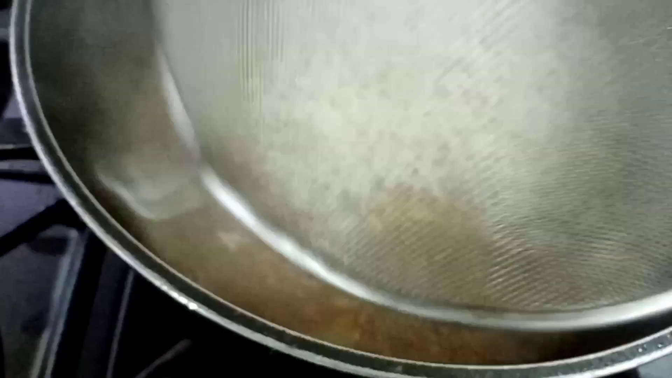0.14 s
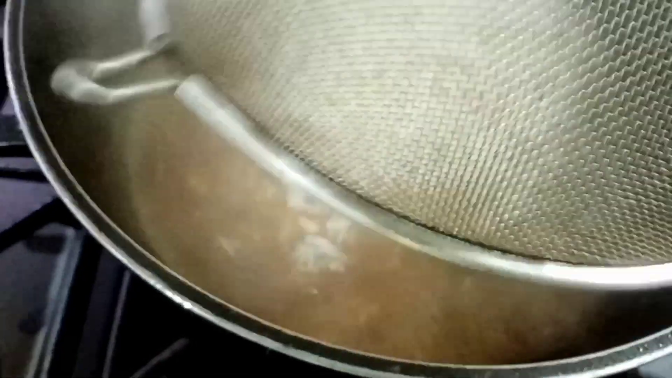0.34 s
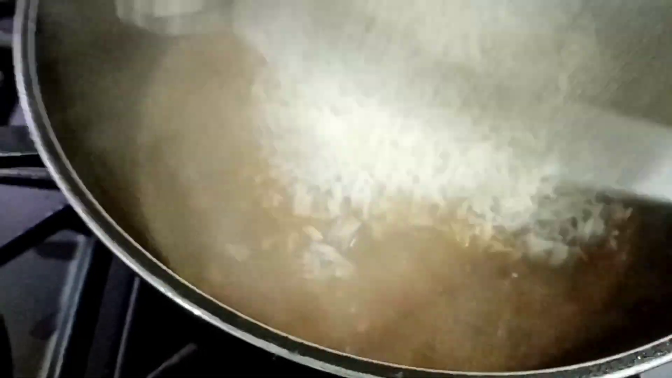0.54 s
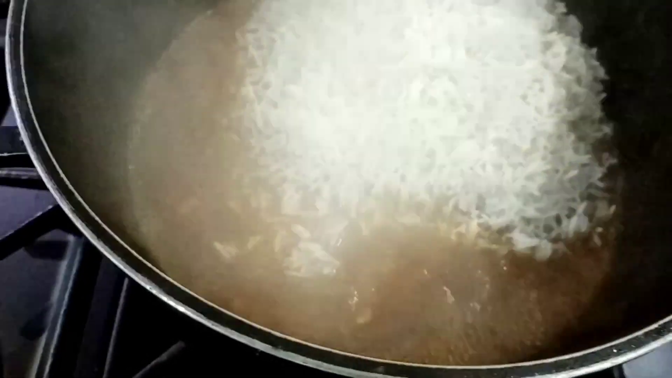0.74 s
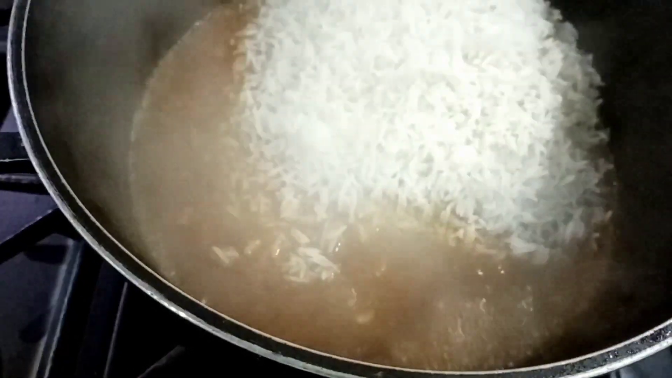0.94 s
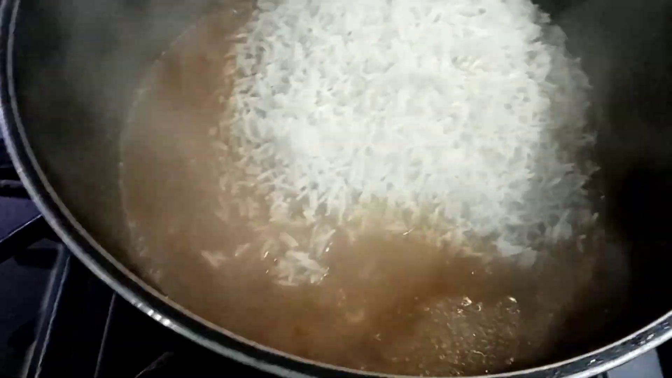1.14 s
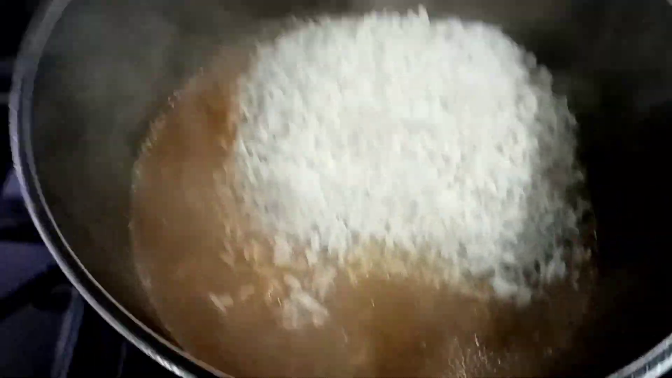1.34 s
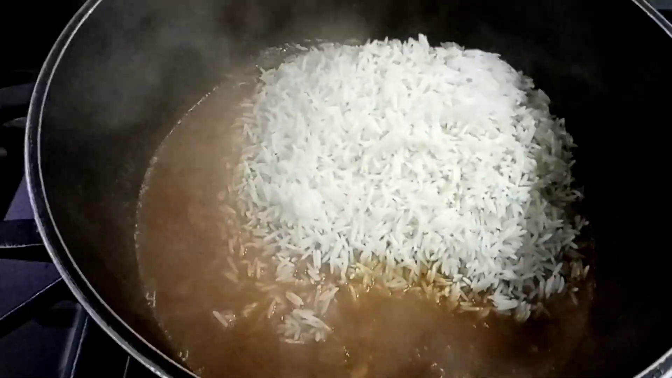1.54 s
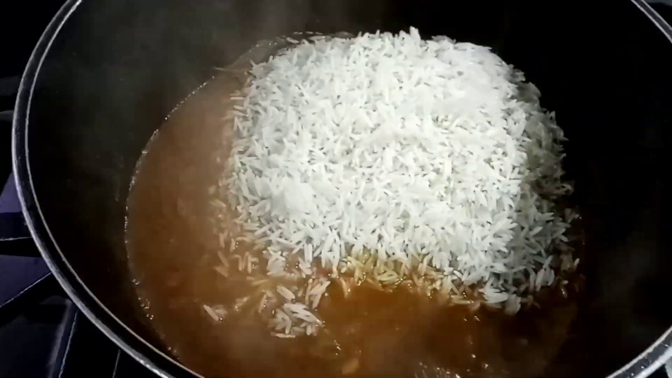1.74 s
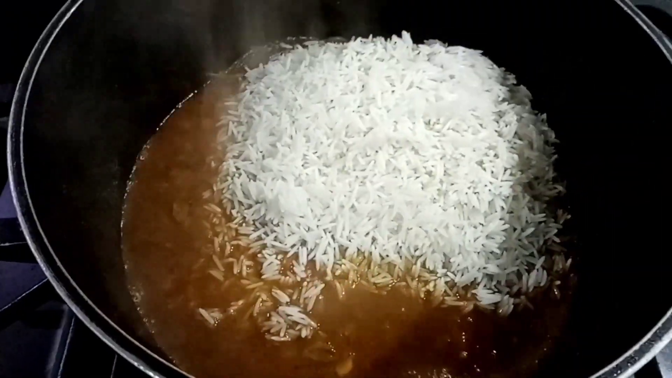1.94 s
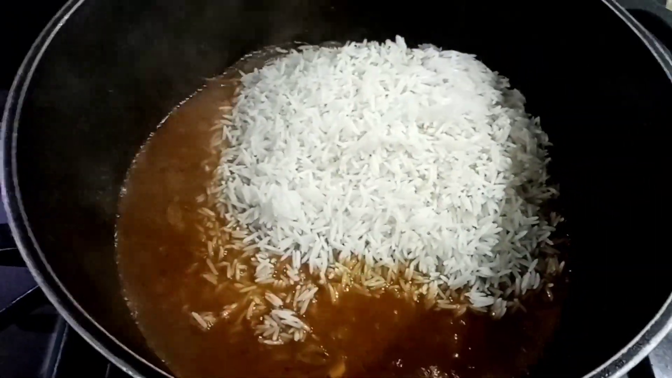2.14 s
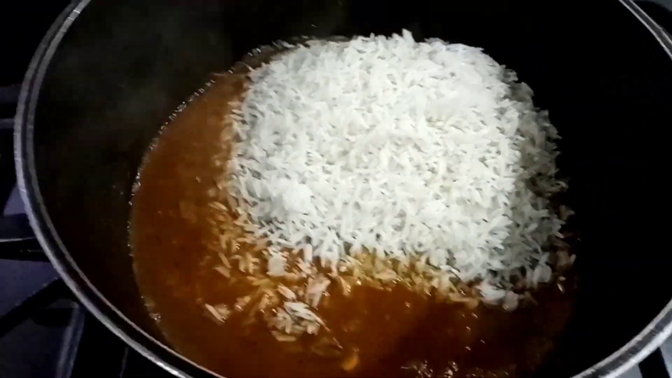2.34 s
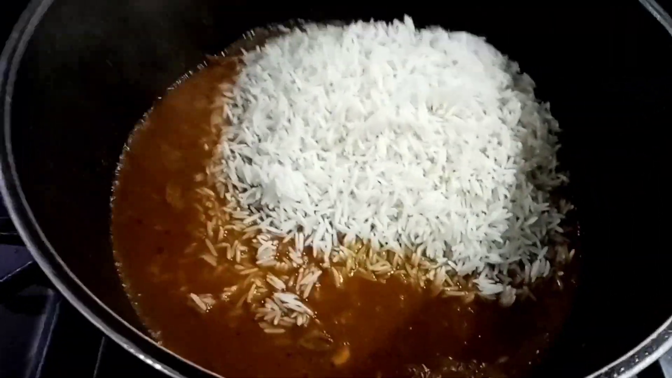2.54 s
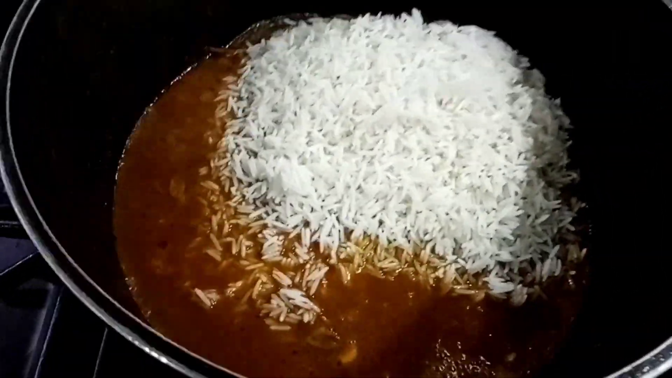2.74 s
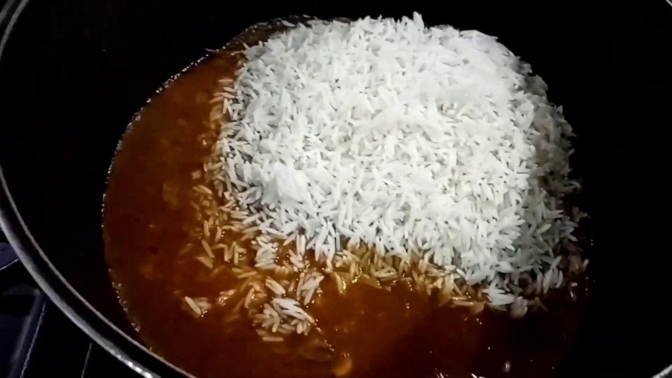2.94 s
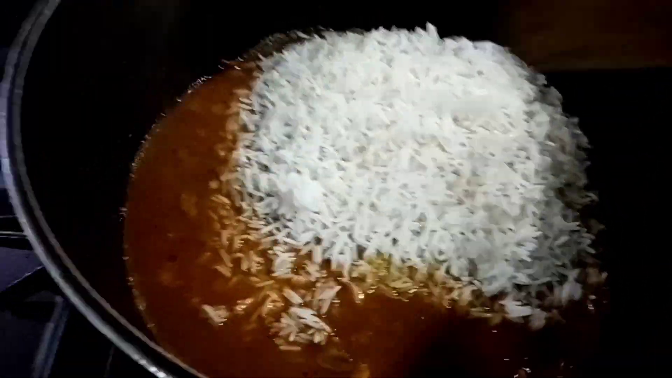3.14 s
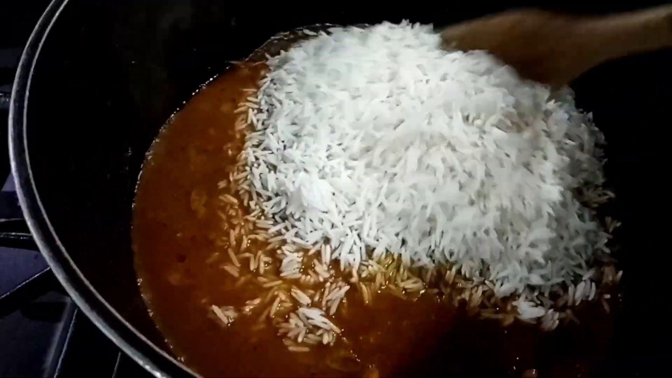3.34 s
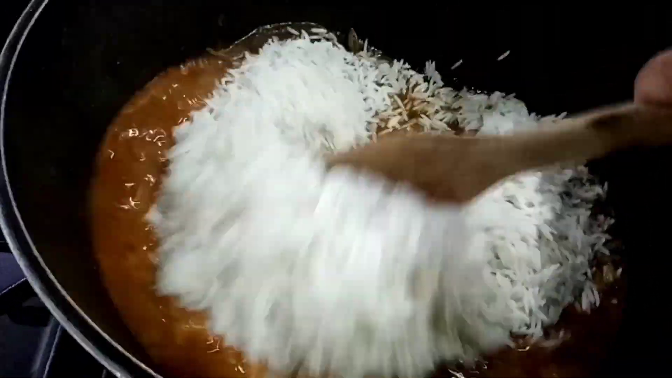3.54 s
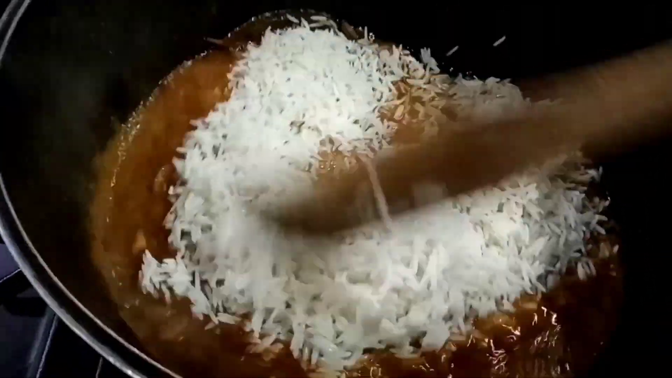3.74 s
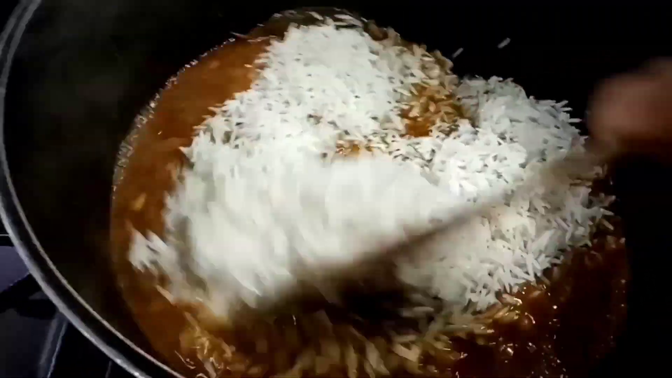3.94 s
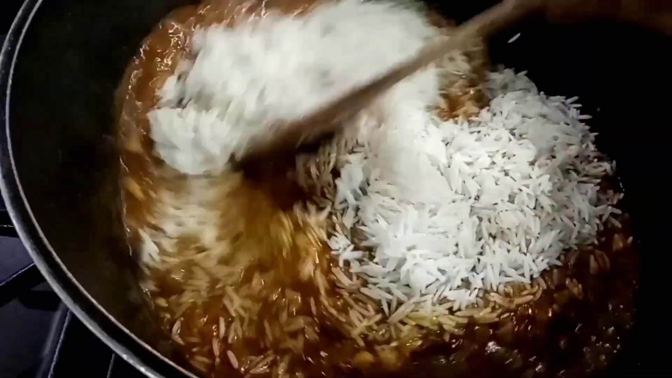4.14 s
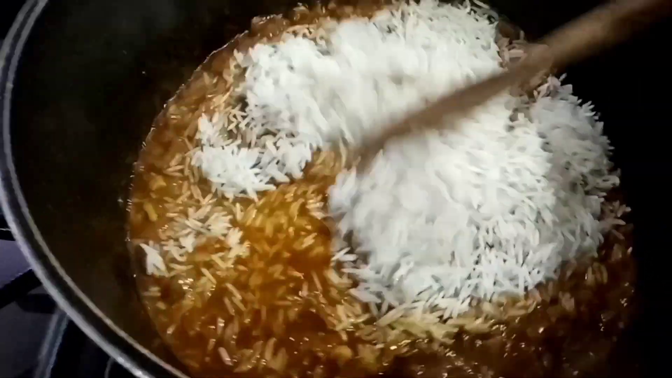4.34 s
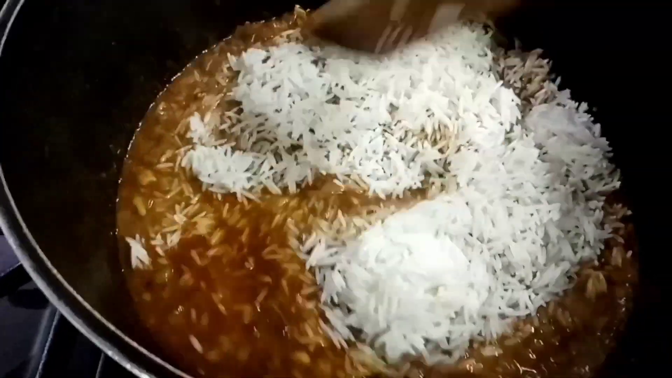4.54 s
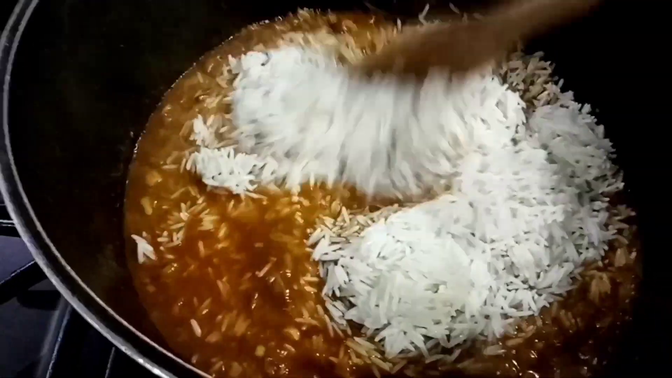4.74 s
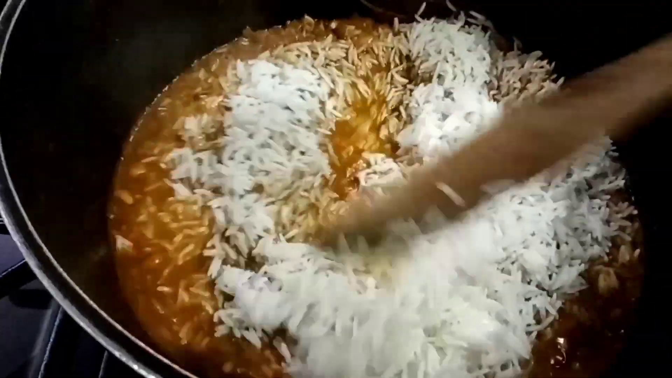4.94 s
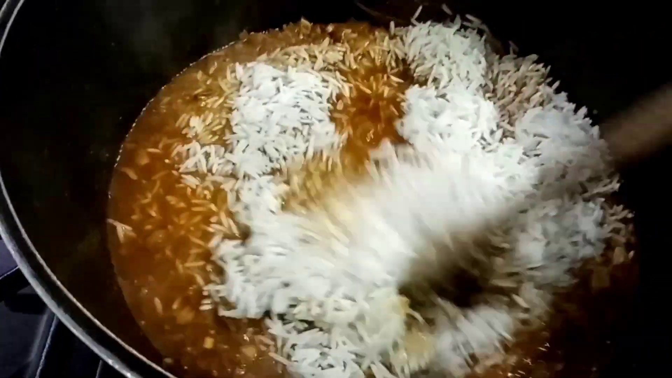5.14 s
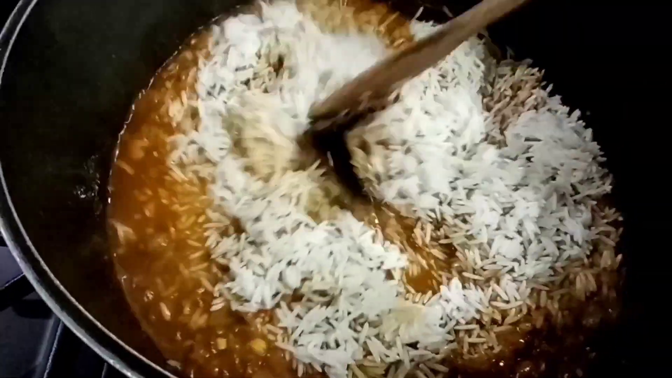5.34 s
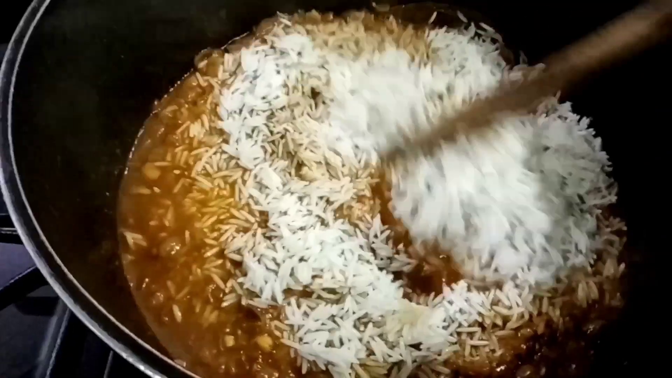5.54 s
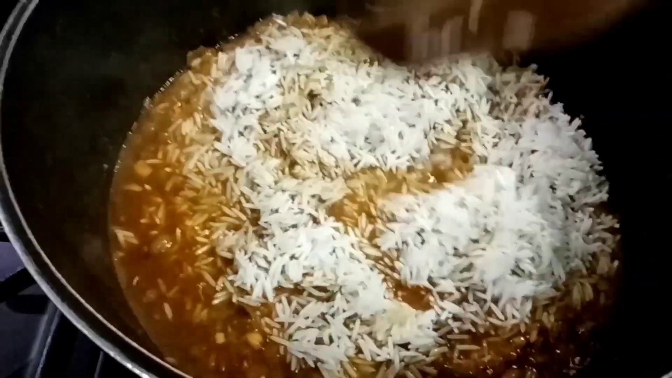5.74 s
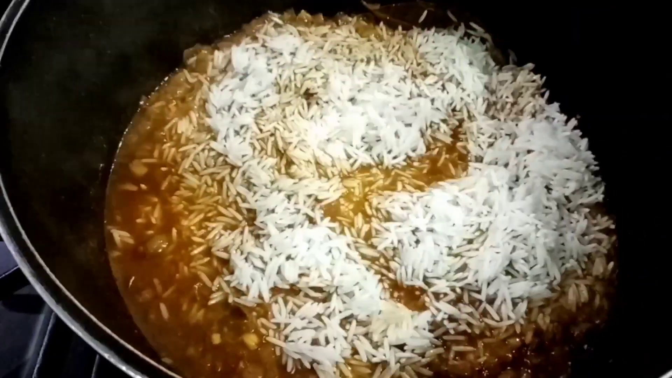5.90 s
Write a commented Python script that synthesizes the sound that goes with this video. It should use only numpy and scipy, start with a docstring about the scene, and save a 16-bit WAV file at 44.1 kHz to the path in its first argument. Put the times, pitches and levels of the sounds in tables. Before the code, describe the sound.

Close up in a small kitchen, broth simmers quietly over a steady low hum. Bright, ringing taps of a metal strainer on the pot come first, with soft plops of falling rice. The strainer then clatters to rest slightly to the right. Bubbles fizz and pop, something squeaks faintly, and a wooden spoon rattles as it is lifted. It stirs the rice with a soft wet rustle and five uneven knocks.

```python
"""Over fizzing broth and an appliance's hum, a metal strainer clinks on the rim of a pot.
The last clumps of rice drop in, bubbles pop, and the strainer is put down with a clatter.
After a few faint squeaks a wooden spoon is picked up and pushed through the rice, knocking on the pot.
Each blow is a short crack plus ringing modes, answered by a small kitchen;
fizz, patter and rubbing are filtered showers of tiny ticks."""
import sys
import numpy as np
from scipy import signal
from scipy.fft import rfft, irfft, next_fast_len
from scipy.io import wavfile
from scipy.ndimage import uniform_filter1d

SR = 44100
rng = np.random.default_rng(int(sys.argv[2]) if len(sys.argv) > 2 else 0)


def put_to_file(sound):
    """Save the sound as 16-bit audio at rate SR, in the file named by the first command-line argument."""
    columns = np.atleast_2d(sound).T  # one column per channel
    safe = np.clip(columns, -1, 1)
    whole_steps = np.round(safe * 32767)
    wavfile.write(sys.argv[1], SR, whole_steps.astype(np.int16))


N = 263277
TIME = np.arange(N) / SR
MIC_LAG_S = 0.0008


def undb(db):
    """Decibels to gain."""
    return 10 ** (np.asarray(db) / 20)


def unit(x):
    """Scale to rms 1."""
    return x / np.sqrt(np.mean(x ** 2))


def across(hz, points):
    """Interpolate (freq_hz, value) points on a log-frequency axis."""
    freq_hz, value = np.transpose(points)
    return np.interp(np.log(np.maximum(hz, 1)), np.log(freq_hz), value)


def colour(x, points):
    """Minimum-phase filter through (freq_hz, gain_db) points: rings after a blow, never before."""
    size = next_fast_len(x.shape[-1] // 2 + 2048) * 2
    gain = undb(across(np.fft.rfftfreq(size, 1 / SR), points))
    cepstrum = irfft(np.log(gain))
    cepstrum[1:size // 2] *= 2
    cepstrum[size // 2 + 1:] = 0
    return irfft(rfft(x, size) * np.exp(rfft(cepstrum)), size)[..., :x.shape[-1]]


def swells(rows):
    """Gain over time, one bell curve per row."""
    return sum(undb(db) * np.exp(-2 * ((TIME - mid_s) / half_s) ** 2) for mid_s, db, half_s in rows)


def wander(rate_hz):
    """Smooth random curve, rms 1."""
    hold = int(SR / rate_hz)
    steps = np.repeat(rng.standard_normal(N // hold + 1), hold)
    return unit(uniform_filter1d(uniform_filter1d(steps, hold), hold)[:N])


def add(out, start_s, sound):
    """Mix in a stereo sound; it reaches the left mic first."""
    for channel, arrival_s in enumerate((start_s - MIC_LAG_S / 2, start_s + MIC_LAG_S / 2)):
        i = int(arrival_s * SR)
        out[channel, i:i + sound.shape[1]] += sound[channel, :N - i]


def stereo_noise(size, alike_hz):
    """White noise at two mics: alike in the bass, unrelated well above alike_hz."""
    mid, side = rfft(rng.standard_normal((2, size)))
    likeness = 1 / (1 + (np.fft.rfftfreq(size, 1 / SR) / alike_hz) ** 2)
    spectra = mid * np.sqrt(1 + likeness) + np.outer([1, -1], side * np.sqrt(1 - likeness))
    return unit(irfft(spectra, size))


# room decay: freq_hz, t60_s
ROOM_DECAY = [(150, 0.51), (700, 0.79), (3000, 0.61), (7000, 0.46), (14000, 0.33)]


def kitchen(x, first_s=0.0019, build_s=0.00023):
    """Dense reflections that build up quickly and die sooner in the treble."""
    hz, t, cells = signal.stft(stereo_noise(SR, 260), SR, nperseg=256)
    decay = undb(-60 * t / across(hz, ROOM_DECAY)[:, None])
    tail = signal.istft(cells * decay, SR)[1][:, :SR]
    onset = 1 - np.exp(-np.maximum(TIME[:SR] - first_s, 0) / build_s)
    return signal.fftconvolve(x, unit(tail * onset) / np.sqrt(SR), axes=1)[:, :N]


def grains(rate_hz, spread_db, room_db):
    """A shower of tiny random ticks, smeared by the room."""
    size = undb(spread_db * np.minimum(rng.exponential(size=N), 5))
    ticks = (rng.random(N) < rate_hz / SR) * size * rng.choice([-1, 1], N)
    ticks = np.array([ticks, np.roll(ticks, int(MIC_LAG_S * SR))])
    return unit(ticks + undb(room_db) * kitchen(ticks))


def bubble(hz, cycles=9, glide=0.012):
    """A bursting bubble rings for a few cycles, rising a little."""
    age = hz * TIME[:SR // 50] / cycles
    ring = np.exp(-age) * np.sin(2 * np.pi * cycles * age * (1 + glide * age))
    return np.tile(ring, (2, 1))


def wet_ticks(count, spread_db=9, low_hz=4800, high_hz=12000, room_db=-4):
    """Small bubbles burst at random, each with its own pitch and size."""
    out = np.zeros((2, N))
    for when, pitch, size in rng.random((count, 3)):
        start_s = MIC_LAG_S + when * (TIME[-1] - 2 * MIC_LAG_S)
        pitch_hz = low_hz * (high_hz / low_hz) ** pitch
        add(out, start_s, undb(spread_db * size ** 2) * bubble(pitch_hz, cycles=3.5))
    return unit(out + undb(room_db) * kitchen(out))


# broth boiling up: mid_s, level_db, half_length_s
SURGES = [(2.32, -55, 0.028), (2.53, -57, 0.14), (2.95, -67, 0.5)]
# broth spectrum: freq_hz, gain_db
SIMMER_COLOUR = [(400, -4.5), (1200, 3.5), (2200, 1.5), (3400, -13), (4300, 3.5), (5200, -4.5), (6300, 5),
                 (7600, -2), (9300, 6), (11000, -8.5), (13500, -11), (15300, 5.5)]


def simmer(start_db=-52.5, cooling_db_per_s=0.65):
    """Tiny bubbles fizz in uneven surges, sinking slowly as the rice cools the broth."""
    fizz = unit(colour(grains(rate_hz=2200, spread_db=3.5, room_db=20.5), SIMMER_COLOUR))
    ticks = undb(-9.5) * wet_ticks(count=380)
    heat = undb(start_db - cooling_db_per_s * TIME) + swells(SURGES)
    return (fizz + ticks) * heat * undb(1.2 * wander(21))


# hum harmonics: freq_hz, rms_db
HUM = [(100, -46), (200, -61.5), (300, -72)]
# air spectrum: freq_hz, gain_db
AIR_COLOUR = [(20, -8), (50, -7), (100, 10.5), (150, 1), (260, 1.5), (450, -6.5), (720, -2), (850, -5.5),
              (1020, -1), (1350, -13), (3000, -10), (8000, -21.5)]


def appliance(air_db=-53.5, left_lead_rad=0.83):
    """A mains hum that wavers a little, over a soft rush of air."""
    phase = 0.14 * wander(4) + np.array([[left_lead_rad], [0]])
    waver = undb(0.5 * wander(9))
    hum = sum(np.sqrt(2) * undb(db) * np.sin(2 * np.pi * hz * TIME + hz / HUM[0][0] * phase)
              for hz, db in HUM)
    air = undb(air_db) * unit(colour(stereo_noise(N, 74), AIR_COLOUR))
    return hum * waver + air * undb(0.5 * wander(4.75))


def crack(t60_s, alike_hz):
    """A contact shakes all the crowded, well-damped modes equally; their phases scatter as they die."""
    fade = np.exp(-np.log(1000) * TIME[:SR // 2] / t60_s)
    phase = np.angle(rfft(stereo_noise(SR // 2, alike_hz) * fade, SR))
    flat_burst = irfft(np.exp(1j * phase))[:, :SR // 2]
    return flat_burst * np.sqrt(np.sum(fade ** 2))


def blow(start_s, db, hard_db, t60_s, ping_hz, spectrum, modes, ring_db,
         room_db, bass_db, ping_db, rise_s, alike_hz, ring_room_db=-6):
    """One contact: a short crack and ringing modes. Returns (direct, room send)."""
    t = TIME[:SR // 2]
    attack = undb(db) * (1 - np.exp(-t / rise_s))
    hardness = [(300, bass_db), (1500, 0), (6500, hard_db)]  # harder is brighter
    burst = colour(colour(attack * crack(t60_s, alike_hz), spectrum), hardness)
    # the struck spot favours its own resonance
    spot = [(ping_hz / 2 ** 0.2, 0), (ping_hz, ping_db), (ping_hz * 2 ** 0.2, 0)]
    mode_hz, mode_db, mode_t60_s = np.transpose(modes)
    partials = np.exp(np.outer(2j * np.pi * mode_hz - np.log(1000) / mode_t60_s, t))
    gains = undb(ring_db + mode_db + across(mode_hz, spot) / 2)
    mic_phasors = np.exp(2j * np.pi * rng.random((2, len(modes))))
    ring = attack * ((gains * mic_phasors) @ partials).imag
    direct, send = np.zeros((2, 2, N))
    add(direct, start_s, colour(burst, spot) + ring)
    add(send, start_s, undb(room_db) * (burst + undb(ring_room_db) * ring))
    return np.array([direct, send])


def in_room(blows, first_s=0.0031):
    """Blows plus their reflections, with the deepest bass below about 60 Hz cut away."""
    direct, send = blows
    low_cut = signal.butter(2, 60, "high", fs=SR, output="sos")
    return signal.sosfilt(low_cut, direct + kitchen(send, first_s))


# pot rim modes: freq_hz, level_db, t60_s, antinode_0_1
RIM_MODES = [(1735, -15, .3, .95), (1836, -19.5, .28, .36), (2085, -11.5, .48, .53), (2340, -15.5, .5, .62),
             (2660, -9, .35, .8), (2965, -6, .22, .33), (3127, -6.5, .24, .53), (3483, -15, .35, .73),
             (3564, -15, .25, .45), (3820, -18, .35, .72), (4167, 0.5, .18, .76), (4384, 1.5, .1, .25),
             (4592, -12, .16, .27), (5883, -6, .14, .87), (6219, -8, .17, .62), (6363, -14, .4, .65),
             (6663, -7, .18, .15)]


def rim_modes(place, node_db=-20, split_hz=25, twin_db=-4):
    """Modes are loudest struck at an antinode; the rim is not quite round, so each has a beating twin."""
    modes = []
    for hz, db, t60_s, antinode in RIM_MODES:
        struck_db = db + node_db * np.sin(np.pi * (place - antinode)) ** 2
        modes += [(hz, struck_db, t60_s), (hz + split_hz, struck_db + twin_db, t60_s)]
    return modes


# strikes on the rim: start_s, level_db, hard_db, ring_db, place_0_1, ping_hz, skid_s
CLINKS = [(0.0865, -8.5, -0.5, -25, 0.05, 6400, 0.0024), (.111, -20, 0, -10.5, 0.94, 5700, .001),
          (0.205, -10, 0.5, -10, 0.39, 6200, 0.015), (0.2128, -16, -19, -12.5, 0, 4340, .001),
          (.224, -18.5, -20, -9, 0.35, 3350, .001), (0.338, -7, 7, -19, 0.72, 6100, 0.0021)]
# rim spectrum: freq_hz, gain_db
RIM_COLOUR = [(60, -13), (220, -11), (450, -7.5), (900, -9.5), (1500, -5), (2200, -10), (3500, -7.5),
              (4250, 1), (5100, -6), (6300, 3), (7600, -1.5), (10000, -4), (13000, -16.5), (15500, -4)]


def strainer_on_rim(t60_s=0.029, shortening=0.31, skid_db=-18.5):
    """The strainer skids on the rim, then catches; the harder the strike, the shorter its crack."""
    blows = skid_gain = 0
    for start_s, db, hard_db, ring_db, place, ping_hz, skid_s in CLINKS:
        crack_t60_s = t60_s * undb(-shortening * hard_db)
        blows += blow(start_s, db, hard_db, crack_t60_s, ping_hz, RIM_COLOUR, rim_modes(place), ring_db,
                      room_db=-3.5, bass_db=3.5, ping_db=8.5, rise_s=0.00063, alike_hz=940,
                      ring_room_db=-9.5)
        run_up = np.exp(-abs(TIME - start_s) / skid_s) * (TIME < start_s)
        skid_gain += undb(skid_db + db + hard_db) * run_up
    return in_room(blows) + skid_gain * unit(colour(stereo_noise(N, 925), RIM_COLOUR))


# rice landing in the broth: mid_s, level_db, half_length_s
CLUMPS = [(.135, -37.5, 0.057), (.237, -36.5, 0.03), (.29, -42.5, 0.034), (.39, -38, 0.033),
          (.44, -45, 0.059)]
# landing spectrum: freq_hz, gain_db
CLUMP_COLOUR = [(90, -21), (160, 0), (228, 6.5), (290, -0.5), (500, -2.5), (680, -11), (930, -8.5),
                (1400, -20), (4000, -41)]


def rice_landing(room_db=-7, left_db=-2):
    """Each clump, shaken loose by the taps, is a soft patter that booms in the hollow of the pot."""
    impacts = grains(rate_hz=2000, spread_db=0, room_db=-8.5)
    patter = swells(CLUMPS) * unit(colour(impacts, CLUMP_COLOUR))
    return undb([[left_db], [0]]) * (patter + undb(room_db) * kitchen(patter))


# larger bubbles: start_s, level_db, pitch_hz
POPS = [(0.653, -45.5, 6800), (2.077, -55, 5950), (2.199, -44, 5900), (2.235, -47, 4400),
        (2.743, -47, 8600), (3.607, -46, 5860), (4.623, -46, 6070), (4.87, -56, 5240), (5.683, -45, 6580)]


def bubble_pops(t60_s=0.029, room_db=-5):
    """The film of a larger bubble snaps and its hollow rings briefly."""
    out = np.zeros((2, N))
    for start_s, db, pitch_hz in POPS:
        snap = colour(crack(t60_s, alike_hz=900), SIMMER_COLOUR)
        add(out, start_s, undb(db) * colour(snap, [(1500, -6), (6000, -0.5)]))
        add(out, start_s, undb(db + 1) * bubble(pitch_hz))
    return out + undb(room_db) * kitchen(out)


# strainer contacts: start_s, level_db, hard_db, t60_s, room_db, ping_hz
CLATTER = [(1.082, -20, -1, 0.11, -6.5, 970), (1.099, -19, -5.5, 0.1, -21, 2360),
           (1.197, -29.5, 1, 0.072, -6, 2200), (1.2522, 3, 0.5, 0.012, -4, 4400),
           (1.2542, -6.5, -6, 0.0084, 5, 1260), (1.2578, -4.5, 0.5, 0.01, 0.5, 3370),
           (1.482, -16, -5.5, 0.042, -2, 2300), (1.4913, -5.5, -11, 0.026, -12, 341),
           (1.4942, -7.5, 2, 0.023, -4, 2880), (1.4992, -6, 4.5, 0.012, -4.5, 6350),
           (1.540, -12.5, -15, 0.032, -23, 2300), (1.573, -11.5, -12, 0.035, -23, 2460)]
# clatter spectrum: freq_hz, gain_db
CLATTER_COLOUR = [(60, -12), (160, -16.5), (235, -3), (320, -0.5), (490, -3.5), (700, 5.5), (960, -5.5),
                  (1300, -3), (1600, -5), (2200, -2.5), (3500, -3.5), (4550, -7.5), (5400, -10), (6300, -4),
                  (7900, -11.5), (9300, -8.5), (13000, -19.5), (15500, -7)]
# clatter modes: freq_hz, level_db, t60_s
CLATTER_MODES = [(325, -1, .16), (395, 0, .16), (590, -3, .16), (718, -7, .48), (760, -7, .42),
                 (804, -7.5, .38), (1864, -7, .2), (2046, -2, .22), (2285, 1, .17), (3060, -3, .16),
                 (4190, 5, .04), (4560, 3, .035), (6230, 2, .14)]


def strainer_put_down(left_db=-2, scrape_s=0.13):
    """The strainer scrapes, lands and rocks to rest off to the right."""
    blows = 0
    for start_s, db, hard_db, t60_s, room_db, ping_hz in CLATTER:
        thud_db = 2 - 0.67 * hard_db  # soft contacts thud more
        rise_s = 0.0007 * (1 + (t60_s / scrape_s) ** 2)  # long ones start more gently
        blows += blow(start_s, db, hard_db, t60_s, ping_hz, CLATTER_COLOUR, CLATTER_MODES, ring_db=-39.5,
                      room_db=room_db, bass_db=thud_db, ping_db=11, rise_s=rise_s, alike_hz=806)
    return undb([[left_db], [0]]) * in_room(blows, first_s=0.012)


# faint scrapes: mid_s, level_db, half_length_s
SQUEAKS = [(2.433, -48, 0.032), (2.453, -43, 0.01), (2.514, -46.5, 0.016), (2.574, -47, 0.026)]
# squeak spectrum: freq_hz, gain_db
SQUEAK_COLOUR = [(1200, -30), (2800, -17), (3060, 3), (3250, -3), (3600, -13), (4200, -21), (5000, -29),
                 (5850, -18), (7000, -27), (12000, -36)]


def squeaks(room_db=-11):
    """Gentle scrapes: uneven stick-slip ticks excite one narrow resonance and weaker ones above it."""
    slips = grains(rate_hz=1800, spread_db=1.5, room_db=-12)
    rub = swells(SQUEAKS) * unit(colour(slips, SQUEAK_COLOUR))
    return rub + undb(room_db) * kitchen(rub)


# wooden spoon modes: freq_hz, level_db, t60_s
SPOON_MODES = [(1490, -6, 0.048), (2593, -3, 0.031), (4200, -9, 0.05)]


def wood_click(start_s, db, treble_db=0, room_db=-9):
    """The spoon's damped modes give a pitched click. Returns (direct, room send)."""
    t, out = TIME[:SR // 4], np.zeros((2, N))
    tilt = [(2600, 0), (4200, treble_db)]
    click = sum(undb(db + mode_db + across(hz, tilt) - 60 * t / t60_s) * np.sin(2 * np.pi * hz * t)
                for hz, mode_db, t60_s in SPOON_MODES)
    add(out, start_s, np.array([click, click]))
    return np.array([out, undb(room_db) * out])


# spoon contacts: start_s, level_db, hard_db, t60_s, ring_db, ping_hz
HANDLING = [(3.147, -33.5, 2.5, 0.12, -27, 6500), (3.1636, -21.5, -6.5, 0.064, -0.5, 4300),
            (3.177, -25, -0.5, 0.13, 2, 2640), (3.2032, -15.5, -6, 0.05, -20, 2630),
            (3.219, -21.5, -6.5, 0.1, -13, 1500), (3.2357, -16.5, -2, 0.015, -14, 3350),
            (5.955, -26.5, -3.5, 0.26, -11, 6900)]
# handling spectrum: freq_hz, gain_db
HANDLING_COLOUR = [(60, -5), (190, -6.5), (280, -1.5), (480, -6.5), (750, -6), (1500, -2.5), (2100, -5),
                   (2650, -7.5), (3200, -5.5), (4300, -4.5), (7000, -9.5), (13000, -18.5), (15500, -23)]
# low thump modes: freq_hz, level_db, t60_s
THUMP_MODES = [(213, -7, .33), (324, -15, .25), (500, -19, .1)]


def spoon_handled(wood_db=-17, left_db=-2):
    """The wooden spoon rattles and thumps as it is picked up and tapped."""
    blows = 0
    for start_s, db, hard_db, t60_s, ring_db, ping_hz in HANDLING:
        blows += wood_click(start_s, db + wood_db)
        blows += blow(start_s, db, hard_db, t60_s, ping_hz, HANDLING_COLOUR, THUMP_MODES, ring_db,
                      room_db=-9, bass_db=10, ping_db=12, rise_s=0.00075, alike_hz=700)
    return undb([[left_db], [0]]) * in_room(blows)


# spoon strokes: mid_s, level_db, half_length_s
STROKES = [(3.34, -51, 0.2), (3.8, -52, 0.45), (4.27, -61.5, 0.2), (4.7, -56, 0.21), (5.05, -54, 0.26),
           (5.85, -59, 1)]
# sliding rice spectrum: freq_hz, gain_db
RICE_COLOUR = [(200, -42), (700, -8), (1600, 6.5), (3000, 2), (6300, 2.5), (9000, -1), (13000, -31),
               (15500, 6)]
# spoon tip spectrum: freq_hz, gain_db
RUB_COLOUR = [(120, -32), (300, -1.5), (520, -4), (740, -12), (1000, 0.5), (1250, -17), (1500, -8),
              (2200, -64), (5000, -31)]


def stirring(rub_db=-2.5, crackle_db=-12):
    """Wet grains of rice slide and crackle while the spoon's tip sticks and slips on the pot."""
    sliding = grains(rate_hz=2500, spread_db=3.5, room_db=3)
    rice = unit(colour(sliding, RICE_COLOUR)) * undb(wander(22.26))
    slips = grains(rate_hz=600, spread_db=2, room_db=-18)
    rub = unit(colour(slips, RUB_COLOUR)) * undb(rub_db + 0.5 * wander(27))
    crackle = undb(crackle_db) * wet_ticks(count=420)
    return swells(STROKES) * (rice + rub + crackle)


# spoon on the pot: start_s, level_db, depth_0_1, thud_db, ping_hz, rebound_s
KNOCKS = [(3.404, -19.5, 0.5, 9.5, 2340, 0.021), (3.8443, -28.5, 0.93, 15, 960, 0.016),
          (4.2314, -20, 0.32, 9, 1470, 0.018), (5.176, -24.5, 0.37, 13.5, 1160, .021),
          (5.454, -21.5, 0.25, 10.5, 1520, .03)]
# knock spectrum: freq_hz, gain_db
KNOCK_COLOUR = [(60, -52), (200, -1.5), (550, -8), (750, -9.5), (1000, -4.5), (1200, -6.5), (1480, -6.5),
                (1950, -4), (2350, -7.5), (2650, -14.5), (3100, -6.5), (4300, -16), (7000, -14),
                (15500, -37)]
# pot bottom modes: freq_hz, level_db, t60_s
POT_MODES = [(325, -9, .1), (540, 1, .04), (960, -4, .035), (1050, -5, .03), (1330, -3, .02)]


def spoon_knocks(rebound_db=-7.5):
    """Each knock rebounds once; deep in the rice the wood is muffled and the pot's bottom rings more."""
    blows = 0
    for start_s, level_db, depth, thud_db, ping_hz, rebound_s in KNOCKS:
        wood_db = -11.5 - 14 * depth
        hard_db = -1 - 25 * depth
        ring_db = -35 + 32.5 * depth
        t60_s = 0.045 * undb(-5 * depth)
        for hit_s, db in ((start_s, level_db), (start_s + rebound_s, level_db + rebound_db)):
            blows += wood_click(hit_s, db + wood_db, treble_db=-13)
            blows += blow(hit_s, db, hard_db, t60_s, ping_hz, KNOCK_COLOUR, POT_MODES, ring_db,
                          room_db=-1 - 3.2 * depth, bass_db=thud_db, ping_db=10, rise_s=0.00057,
                          alike_hz=2000)
    return in_room(blows)


def scene():
    """Strainer, rice and spoon over the broth and the hum, in stereo."""
    tipping_in = strainer_on_rim() + rice_landing() + strainer_put_down()
    spoon = spoon_handled() + spoon_knocks() + stirring()
    return tipping_in + spoon + squeaks() + simmer() + bubble_pops() + appliance()


# left mic response against the right: freq_hz, gain_db
LEFT_MIC = [(100, -0.5), (220, -3), (700, -1), (2000, -1), (6500, -1), (8200, -4), (10000, -17.5),
            (13000, -21.5), (15500, -23.5)]


def record(dry):
    """The left mic is muffled; both channels are cut steeply above 15.6 kHz."""
    mics = np.array([colour(dry[0], LEFT_MIC), dry[1]])
    top_cut = signal.ellip(10, 0.2, 80, 15600, fs=SR, output="sos")
    return signal.sosfilt(top_cut, mics)


dry = scene()
out = record(dry)
put_to_file(out)
```